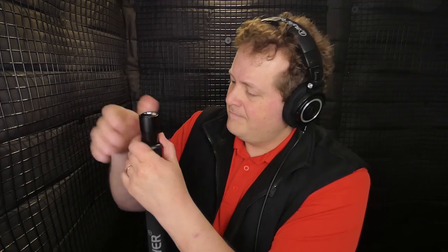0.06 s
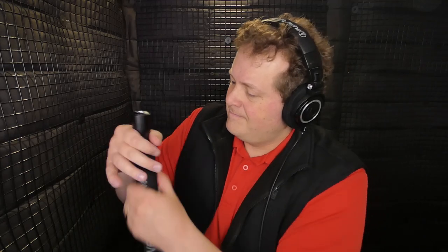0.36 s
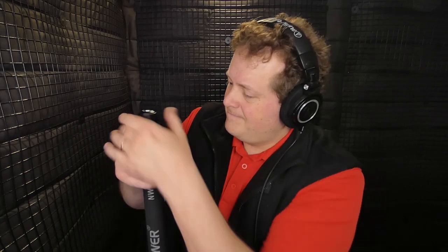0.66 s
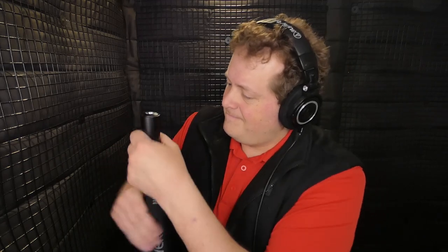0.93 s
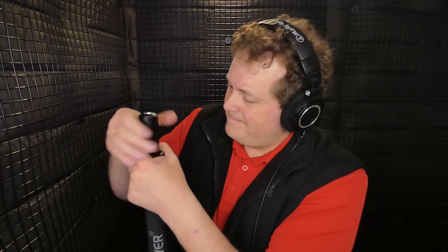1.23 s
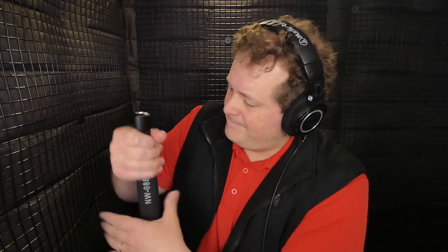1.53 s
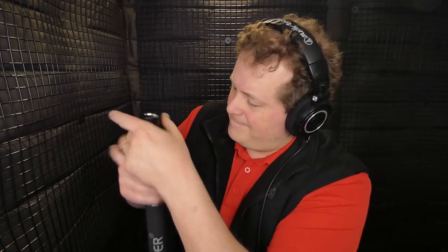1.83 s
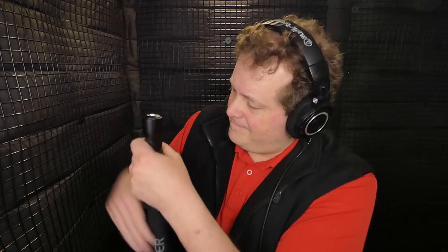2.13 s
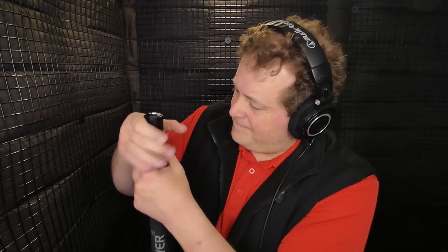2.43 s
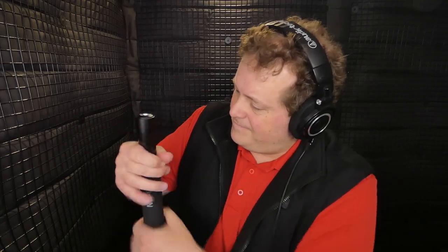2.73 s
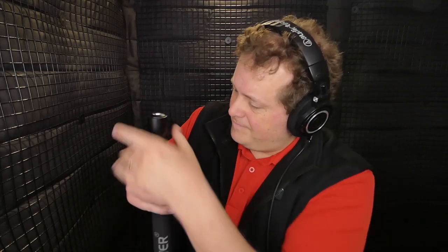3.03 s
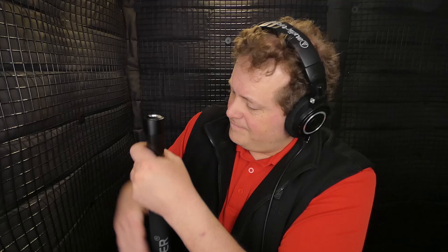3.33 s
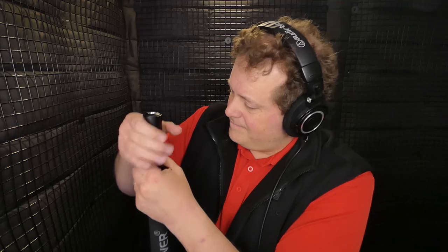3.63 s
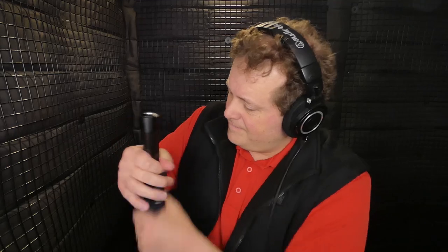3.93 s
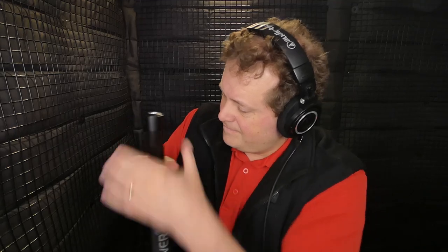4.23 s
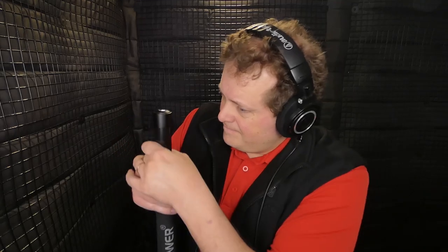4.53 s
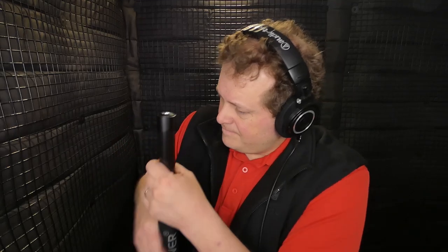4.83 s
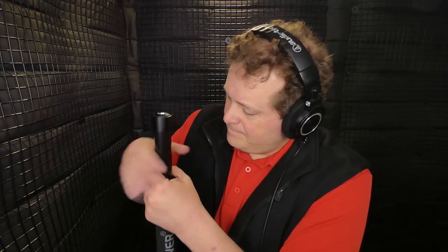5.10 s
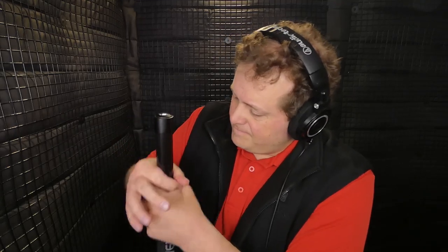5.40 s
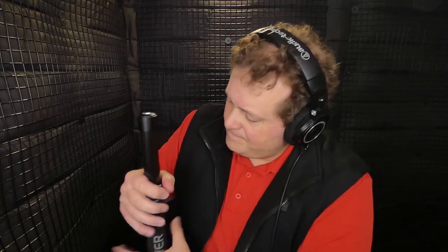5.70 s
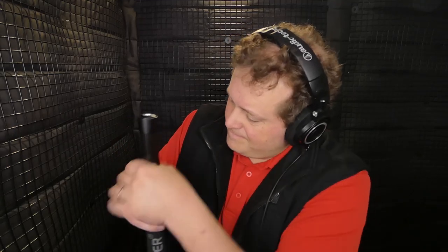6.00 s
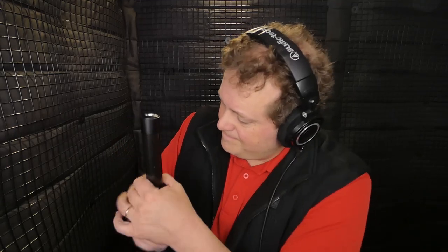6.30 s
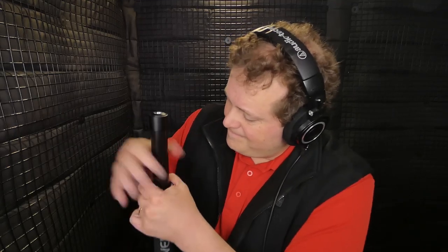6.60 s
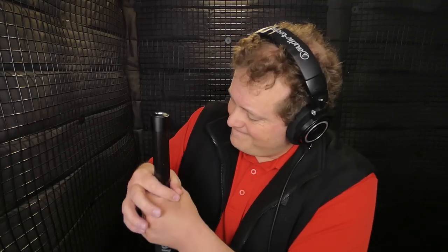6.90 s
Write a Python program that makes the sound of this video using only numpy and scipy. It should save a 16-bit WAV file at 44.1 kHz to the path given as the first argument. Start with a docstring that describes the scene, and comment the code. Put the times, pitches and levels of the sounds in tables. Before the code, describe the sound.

Two hands rub and grip an aluminum telescoping pole for about seven seconds, close to the microphone in a padded booth with almost no echo. Palms slide in short, uneven, hissing swishes, roughly two a second, with a slightly hollow rubbing tone. Small fingertip pops, ticks and dull knocks are scattered throughout. New grabs shake the pole with low thumps, notably at 0.8 and 2 seconds, and soft skin creaks come at the very start and around 1 second. A sharper tap lands at 2.5 seconds. The heaviest thump comes at 3.2 seconds with a firm swish, followed at 3.4 by a brief, bright, squeaky creak. More knocks and thumps fall between 3.6 and 4.7 seconds, with faint creaks near the end of that stretch. From 5 seconds the handling is lighter, with clear swishes at 5.4 and 7 seconds. A quiet, low room rumble continues underneath.

```python
"""Hands on an aluminium pole

Two hands work along a telescoping pole, close to one microphone in a padded booth. Sliding friction
makes the palms hiss and rings the air cavities under them; fingers tap and peel off the tube, and
tight skin creaks in stick-slip. Each new grab shakes the pole with a low thump, over a quiet room rumble."""
import sys
import numpy as np
from scipy import signal
from scipy.fft import rfft, irfft
from scipy.io import wavfile
from scipy.ndimage import uniform_filter1d

SR = 44100
rng = np.random.default_rng(int(sys.argv[2]) if len(sys.argv) > 2 else 0)


def dump_mix(stems):
    """Bounce the given channels to the path in sys.argv[1] as a 16-bit WAV at rate SR."""
    frames = np.atleast_2d(stems).T  # one column per channel
    limited = np.clip(frames, -1, 1)  # hard clip at full scale
    pcm = np.round(limited * 32767).astype(np.int16)
    wavfile.write(sys.argv[1], SR, pcm)


N = 315315
TIME = np.arange(N) / SR


def amp(db):
    """Amplitude ratio of a level in decibels."""
    return 10 ** (np.asarray(db) / 20)


def unit_rms(x):
    """Normalisation to an rms of 1."""
    return x / np.sqrt(np.mean(x ** 2) + 1e-20)


def add(mix, start_s, sound):
    """Superposition: a sound joins the mix at its start time."""
    part = mix[max(round(start_s * SR), 0):][:len(sound)]
    part += sound[:len(part)]


def colour(x, spectrum, size=8192):
    """Minimum-phase filtering by a spectrum of (frequency_hz, gain_db) points."""
    hz, db = np.transpose(spectrum)
    log_hz = np.log(abs(np.fft.fftfreq(size, 1 / SR)) + 1)
    log_gain = np.log(amp(np.interp(log_hz, np.log(hz), db)))
    response = np.fft.ifft(np.exp(np.conj(signal.hilbert(log_gain)))).real[:size // 2]
    return signal.fftconvolve(x, response)[:len(x)]


def wander(rate_hz):
    """Low-pass Gaussian noise: a smooth random fluctuation of rms 1."""
    hz = np.fft.rfftfreq(N, 1 / SR)
    return unit_rms(irfft(rfft(rng.standard_normal(N)) * np.exp(-(hz / rate_hz) ** 2), N))


def tube(x, reflection):
    """Reflection at the tube's end returns the wave twice, weaker each time."""
    lag = round(.00067 * SR)  # one round trip
    delayed = np.pad(x, (2 * lag, 0))
    return x + reflection * delayed[lag:lag + len(x)] + .17 * reflection ** 2 * delayed[:len(x)]


def friction(grains_per_s, spread_db, smooth):
    """Friction noise: sparse catches of the skin over a Gaussian bed of countless tiny slips."""
    size = amp(spread_db * np.minimum(rng.exponential(1, N), 3.5))
    catches = size * rng.choice([-1, 1], N) * (rng.random(N) < grains_per_s / SR)
    return unit_rms(unit_rms(catches) + smooth * rng.standard_normal(N))


def resonate(x, hz, width_hz):
    """A driven, damped resonator whose natural frequency follows the curve hz."""
    phasor = np.exp(2j * np.pi * np.cumsum(hz) / SR)
    pole = np.exp(-np.pi * width_hz / SR)
    return 2 * (phasor * signal.lfilter([1 - pole], [1, -pole], x / phasor)).real


def ringing(modes):
    """Forced vibration: random jostling drives each mode, shaped by two resonators in series."""
    out = np.zeros(N)
    for hz, nominal_width_hz, db in modes:
        pitch, width_hz = np.full(N, hz), 1.32 * nominal_width_hz
        once = resonate(rng.standard_normal(N), pitch, width_hz)
        out += amp(db) * unit_rms(resonate(once, pitch, width_hz))
    return unit_rms(out)


def stroking(layer, follow, lift_db_per_s, rest_db):
    """Friction grows with sliding speed: a layer's gain arches over each stroke and dies as skin lifts."""
    # strokes of a hand: fastest_s, rise_s, fall_s, sag_db (at both ends, for follow = 1),
    # then relative levels: hiss_db, swish_db, rub_db, body_db, rumble_db
    strokes = [(.005, 0.046, 0.08, 17, -60, -60, -59.5, -78, -82),
               (.16, 0.06, 0.027, 11, -60.5, -71, -66, -67, -69),
               (0.257, 0.085, 0.2, 28.5, -40.5, -43.5, -47.5, -55.5, -49),
               (.479, 0.012, 0.24, 19, -64.5, -60.5, -60, -59.5, -50.5),
               (.688, 0.029, 0.049, 10, -56, -52.5, -58.5, -72, -61),
               (0.794, .056, 0.15, 18.5, -38, -40.5, -46, -57.5, -53),
               (.956, .022, 0.06, 6.5, -58, -47, -48.5, -43.5, -46.5),
               (1.08, 0.037, 0.17, 34, -51, -49.5, -47.5, -52.5, -47.5),
               (1.316, 0.067, .13, 14.5, -38, -42, -43, -57, -49),
               (1.469, 0.003, 0.066, 14, -43, -45, -43, -49, -53),
               (1.594, .009, 0.04, 30, -67, -60, -46.5, -49, -50.5),
               (1.672, 0.074, 0.042, 27, -48, -52.5, -50.5, -53, -51.5),
               (1.815, .1, 0.036, 28, -43, -46, -45, -51, -45),
               (1.986, 0.1, 0.18, 22.5, -37.5, -46.5, -46, -46, -46.5),
               (2.012, 0.026, 0.018, 7, -34.5, -41, -56, -55, -52),
               (2.085, 0.034, 0.032, 6, -44.5, -58, -66, -54, -46),
               (2.22, 0.028, 0.15, 20, -61, -52, -53, -58, -49),
               (2.421, 0.09, 0.022, 12.5, -49, -45, -51.5, -70, -59),
               (2.632, 0.16, 0.12, 22, -39.5, -37.5, -47.5, -51.5, -44),
               (2.852, 0.09, 0.028, 11.5, -40, -45.5, -55, -61, -47.5),
               (3.003, 0.078, 0.014, 7.5, -54, -52, -53, -53.5, -59),
               (3.168, 0.12, 0.15, 27.5, -36, -40, -40, -41.5, -38),
               (3.477, 0.41, 0.062, 6.5, -57, -50, -53.5, -58.5, -49.5),
               (3.641, 0.078, 0.04, 19, -46, -45, -52, -53.5, -56),
               (3.708, .02, .07, 22, -50.5, -52, -54, -64, -72),
               (3.865, 0.13, 0.2, 22.5, -39.5, -40.5, -45.5, -52.5, -44),
               (3.973, 0.0046, 0.095, 17, -65, -45, -53, -52, -47),
               (4.161, 0.064, 0.073, 11, -63.5, -56.5, -52.5, -50.5, -52.5),
               (4.308, 0.046, .018, -1, -55.5, -50, -49.5, -51.5, -50),
               (4.421, 0.088, 0.13, 16, -61.5, -54.5, -52.5, -49, -50),
               (4.631, 0.11, 0.047, 20, -39, -39.5, -41, -44.5, -48),
               (4.811, .1, 0.03, 6.5, -50.5, -57, -53, -49.5, -54.5),
               (5.022, 0.018, 0.02, 9, -62, -55, -58.5, -62, -60),
               (5.13, 0.031, 0.034, 2, -62.5, -75, -85, -80, -73),
               (5.166, 0.022, 0.11, 24.5, -47.5, -49, -48.5, -50.5, -54.5),
               (5.41, 0.13, 0.034, 10, -57.5, -47.5, -51, -57.5, -67),
               (5.448, 0.041, 0.2, 12.5, -41, -39.5, -47.5, -55, -59),
               (5.719, 0.038, .034, 8, -45.5, -48.5, -53.5, -51.5, -56),
               (5.86, 0.067, 0.082, -9, -78.5, -80, -67.5, -65.5, -68),
               (6.029, 0.1, 0.051, 23, -54, -44, -49, -51.5, -54),
               (6.175, 0.16, 0.062, 22, -48, -42, -50.5, -55, -57),
               (6.347, 0.071, 0.065, 22, -51, -55, -48.5, -55.5, -53),
               (6.54, .01, 0.016, 19, -59, -55, -62, -78, -78),
               (6.633, 0.042, 0.034, 8, -55.5, -56, -66, -75, -83),
               (6.723, 0.069, .085, 15, -63, -54.5, -53.5, -54, -59.5),
               (6.95, 0.15, 0.019, 23, -70, -52.5, -57, -51, -51.5),
               (7.013, 0.065, 0.081, 18.5, -39.5, -38, -48, -53, -51.5),
               (7.143, .025, .03, 9, -66, -65, -58, -56, -60)]
    fastest_s, rise_s, fall_s, sag_db, *levels = np.transpose(strokes)
    layer_db = levels[["hiss", "swish", "rub", "body", "rumble"].index(layer)]
    land_db_per_s, flatness = 1100, 1.27
    t = TIME[::32]
    since = t[:, None] - fastest_s
    slowness = np.minimum(np.maximum(-since / rise_s, since / fall_s), 1) ** flatness
    landing_db = land_db_per_s * np.maximum(-since - rise_s, 0)
    lifting_db = lift_db_per_s * np.maximum(since - fall_s, 0)
    power = (amp(layer_db - follow * sag_db * slowness - landing_db - lifting_db) ** 2).sum(1)
    return np.interp(TIME, t, np.sqrt(power + amp(rest_db) ** 2))


def room_rumble():
    """Steady background noise, with most of its power at low frequencies."""
    # room spectrum: frequency_hz, gain_db
    spectrum = [(20, -9.5), (60, 6.5), (100, -9), (150, -20), (220, -27), (400, -37.5), (700, -29.5),
                (1200, -52), (4000, -71), (9000, -51), (16000, -56)]
    return amp(-50.5) * unit_rms(colour(rng.standard_normal(N), spectrum))


def sliding():
    """Sliding friction: slips merge into hiss in a fast stroke and part into crackle in a slow one."""
    # spectra of the fine hiss and the coarser swish: frequency_hz, gain_db
    hiss_spectrum = [(1500, -36), (3000, -9.5), (4600, -4), (7000, 1), (9500, -1.5), (11500, -6),
                     (14000, -7), (16000, -14.5)]
    swish_spectrum = [(700, -13), (1500, -11), (2400, -6), (3200, -6.5), (4400, -3), (6000, -5),
                      (10000, -24.5)]
    speed = stroking("hiss", follow=1, lift_db_per_s=900, rest_db=-84)
    grainy = 1 / (1 + speed / amp(-55))
    crackle = friction(grains_per_s=900, spread_db=4.5, smooth=1.2)
    drive = np.sqrt(1 - grainy) * rng.standard_normal(N) + np.sqrt(grainy) * crackle
    hiss = unit_rms(colour(drive * amp(1.6 * wander(rate_hz=78)), hiss_spectrum))
    rough = friction(grains_per_s=1100, spread_db=8.5, smooth=1.27)
    palm = resonate(rng.standard_normal(N), 3000 * np.exp(.14 * wander(rate_hz=12.3)), width_hz=270)
    swish = unit_rms(colour(rough, swish_spectrum)) + amp(-6) * unit_rms(colour(palm, swish_spectrum))
    swish_gain = stroking("swish", follow=1, lift_db_per_s=900, rest_db=-75.5)
    return hiss * speed + amp(-3.5) * unit_rms(swish) * swish_gain


def gripping():
    """Cavity resonance: coarse friction rings the hand's hollow, whose pitch shifts as fingers move."""
    # spectrum of the rubbing grip: frequency_hz, gain_db
    spectrum = [(300, -11), (650, 0), (950, 0.5), (1300, 5), (1750, 1.5), (2200, -4.5), (3000, -2),
                (6000, -39.5)]
    drive = friction(grains_per_s=450, spread_db=5, smooth=.82)
    hollow = resonate(drive, 1720 * np.exp(.11 * wander(rate_hz=18)), width_hz=190)
    rub = unit_rms(unit_rms(colour(drive, spectrum)) + amp(-.5) * unit_rms(hollow))
    return amp(-4.5) * rub * stroking("rub", follow=.55, lift_db_per_s=696, rest_db=-73)


def shaking():
    """Forced vibration of the handled pole: rumble, hollow body, a bending hum and a slow sway."""
    # the pole's low modes and body modes: pitch_hz, nominal_width_hz, relative_db
    low_modes = [(57.2, 17, 0), (129.5, 22.7, -4.5)]
    body_modes = [(193.5, 17, -4.5), (236.7, 27, 1.4), (330, 58, -1.7)]
    # spectra of the handling noise: frequency_hz, gain_db
    rumble_spectrum = [(20, -24), (45, -14), (62, -4), (105, 11), (150, 5), (220, -7.5), (400, -48.5)]
    scuff_spectrum = [(100, -28.5), (210, 4.5), (350, -3), (500, -8), (750, -9), (1500, -45.5)]
    # envelope of the lowest bending mode: time_s, level_db
    bend_envelope = [(0.0, -70), (0.26, -58.5), (1.77, -48), (2.37, -51.5), (3.3, -41), (3.4, -48),
                     (5.42, -44), (5.81, -54), (7.15, -41.5)]
    rumble = ringing(low_modes) + amp(-6) * unit_rms(colour(rng.standard_normal(N), rumble_spectrum))
    rumble = unit_rms(rumble) * stroking("rumble", follow=.43, lift_db_per_s=190, rest_db=-76)
    scuff = unit_rms(colour(friction(grains_per_s=200, spread_db=8.5, smooth=.9), scuff_spectrum))
    body = unit_rms(scuff + amp(1) * ringing(body_modes))
    body *= stroking("body", follow=.4, lift_db_per_s=400, rest_db=-68)
    bend_hz, bend_db = 82.6, np.interp(TIME, *np.transpose(bend_envelope))
    swing = amp(bend_db + 2.95 * wander(rate_hz=7.5))  # the grip damps it now more, now less
    bend = np.sqrt(2) * swing * np.sin(2 * np.pi * bend_hz * TIME + .88 * wander(rate_hz=7))
    sway = ringing([(18.15, 4.3, 0)])
    return amp(7.5) * rumble + amp(-3.5) * body + bend + amp(-46.5) * sway


def creaks():
    """Stick-slip: skin holds and lets go in a quick train of impulses, each echoing in the tube."""
    # one list per creak: time_s, slips_per_s, level_db, brightness (0 soft grip, 1 tight)
    gestures = [
        [(.005, 760, -49, 0), (.018, 890, -51.5, 0), (.034, 870, -59, 0), (.046, 1400, -68, 0)],
        [(.945, 266, -50, 0.29), (.968, 330, -44.5, 0.1), (.992, 304, -42, 0.01), (1.007, 360, -46, 0),
         (1.03, 550, -73, 0.04)],
        [(1.072, 270, -40.5, 0.27), (1.08, 310, -48, 0.12), (1.088, 360, -40, 0.18), (1.096, 210, -48, 0)],
        [(3.365, 1080, -66, 0.6), (3.388, 960, -41, 1), (3.402, 540, -34, 0.99), (3.416, 450, -35.5, 1),
         (3.432, 314, -36, 0.97), (3.448, 260, -36, 1), (3.462, 540, -37, 0.98), (3.486, 440, -36.5, 1),
         (3.5, 300, -45, 0.96), (3.53, 400, -63, .8)],
        [(4.52, 170, -49, .15), (4.535, 280, -51, 0.55), (4.552, 170, -50, 0.5), (4.575, 330, -68, 0.1)],
        [(4.71, 134, -50, 0.3), (4.728, 234, -50, 0.27), (4.75, 350, -53, 0.36), (4.77, 180, -57, .3)],
    ]
    # spectra of a slip under a soft and a tight grip: frequency_hz, gain_db
    soft_spectrum = [(200, -17), (650, -15), (920, 16), (1200, -25), (1800, 5.5), (2300, 2), (3200, -1.5),
                     (4500, -17), (8000, -11), (16000, -35)]
    tight_spectrum = [(300, -11), (1000, -17), (2100, -3.5), (2800, 8.5), (3800, 10), (4700, 8.5),
                      (6300, 1.5), (7500, -7.5), (10000, -35), (16000, -94)]
    out = np.zeros(N)
    for rows in gestures:
        time_s, *columns = np.transpose(rows)
        t = np.arange(time_s[0], time_s[-1], 1 / SR)
        rate, db, bright = (np.interp(t, time_s, column) for column in columns)
        jitter, force, grit = rng.standard_normal((3, len(t)))
        uneven = .03 + .12 * (1 - bright) * (rate < 600)  # slow, soft slipping is the least regular
        cycles = np.cumsum(rate * (1 + uneven * unit_rms(uniform_filter1d(jitter, 150)))) / SR
        releases = np.diff(np.floor(cycles), prepend=-1)
        slips = releases * np.exp(3 * uneven * force) * np.sqrt(SR / rate) + .09 * grit
        soft = unit_rms(tube(colour(slips, soft_spectrum), reflection=.22))
        tight = unit_rms(tube(colour(slips, tight_spectrum), reflection=.54))
        add(out, time_s[0], amp(db) * (np.sqrt(1 - bright) * soft + np.sqrt(bright) * tight))
    return out


def hollows():
    """Gliding cavity resonance: friction rings an air pocket that changes size under the moving palm."""
    # air pockets: start_s, length_s, relative_db, start_hz, end_hz
    pockets = [(0.14, 0.2, -51, 2750, 2500), (0.83, 0.091, -77, 1480, 1370), (1.356, 0.1, -51, 1690, 1340),
               (1.723, 0.053, -48, 1850, 2100), (1.91, 0.07, -45, 1610, 1440),
               (2.4, 0.041, -44.5, 4630, 4930), (2.535, 0.07, -42, 1510, 1220),
               (2.766, 0.13, -49, 3250, 3680), (3.193, 0.11, -57, 1730, 1240),
               (3.684, 0.054, -55, 3560, 3970), (3.785, 0.075, -44, 1310, 1390),
               (4.521, 0.06, -43, 1670, 1790), (5.391, 0.086, -41, 4500, 4500),
               (5.506, 0.11, -62, 2480, 2600), (6.116, 0.15, -50, 1500, 1800)]
    out = np.zeros(N)
    for start_s, length_s, db, start_hz, end_hz in pockets:
        n = round(length_s * SR)
        hz = np.geomspace(start_hz, end_hz, n)
        ring = resonate(rng.standard_normal(n), hz, width_hz=.25 * start_hz)
        ring = resonate(ring, hz, width_hz=.22 * start_hz)
        add(out, start_s, amp(db) * unit_rms(ring) * np.sin(np.pi * np.arange(n) / n))
    return amp(-2.5) * out


def light_contacts(count):
    """Random impacts: rows for taps(), as fingertips catch about as hard as the hand is rubbing."""
    rub_db = 20 * np.log10(stroking("rub", follow=.64, lift_db_per_s=501, rest_db=-69))
    at = rng.integers(0, N, count)
    force, pitch, nail = rng.uniform(-.96, 1, (3, count))
    pop_db = rub_db[at] - 4 + 6.5 * force
    tick_db = pop_db - 2 + 6.5 * nail
    pitch_hz, t60_s = 1850 * np.exp(.264 * pitch), np.full(count, .02)
    return list(zip(at / SR, pop_db, pitch_hz, t60_s, tick_db))


def taps():
    """Impulse excitation: each finger contact pops a pocket of air and sends a tick along the tube."""
    # fingers landing and lifting, at relative levels: start_s, pop_db, pitch_hz, t60_s, tick_db
    contacts = [(.2015, -40.5, 2280, .041, -63), (.2069, -43.5, 2030, 0.021, -57),
                (.221, -42, 2330, .021, -57), (.261, -63, 2350, .05, -35.5), (.391, -56, 900, .027, -46.5),
                (.466, -55, 2090, 0.014, -57), (.4817, -60, 1960, .023, -49),
                (.521, -53.5, 1910, 0.013, -56), (.6802, -54, 2190, .014, -33.5),
                (.941, -39, 2310, .01, -60), (1.015, -43, 1800, 0.055, -72), (1.054, -52, 910, 0.027, -55),
                (1.0677, -43, 2800, .011, -64), (1.0956, -37, 1610, 0.016, -46),
                (1.2916, -44, 1950, .018, -53), (1.3071, -39, 1610, 0.01, -40),
                (1.3291, -36, 2300, .026, -45), (1.4644, -39.5, 1340, 0.044, -41),
                (1.4887, -43.5, 1087, .046, -51), (1.6332, -55, 2390, .043, -49.5),
                (1.7683, -46.5, 2165, .01, -43), (1.8261, -37.5, 1700, 0.023, -62),
                (1.928, -35.5, 1595, 0.034, -53), (2.1168, -47.5, 2660, 0.013, -61),
                (2.2094, -55, 1670, 0.011, -48.5), (2.5196, -47, 1780, 0.021, -63),
                (2.5458, -29, 1590, 0.012, -32), (2.7558, -53, 865, 0.063, -44.5),
                (2.942, -49, 1990, 0.018, -61), (3.0831, -42.5, 1730, 0.015, -43),
                (3.1203, -39, 1450, .03, -52), (3.1508, -37, 1067, 0.077, -34),
                (3.1603, -38.5, 2290, .03, -37), (3.606, -47, 1680, 0.025, -45),
                (3.6191, -44.5, 1734, 0.031, -39), (3.6708, -46, 1720, 0.032, -53),
                (3.7808, -32.5, 1437, 0.026, -37.5), (3.7862, -39, 1380, .027, -40),
                (3.9276, -41, 1470, .021, -53), (3.9729, -36.5, 1910, 0.0073, -56),
                (4.0038, -46.5, 1690, .015, -40), (4.0602, -49, 1860, .016, -68),
                (4.116, -63, 2200, .012, -54), (4.2419, -46, 2176, 0.022, -49.5),
                (4.2674, -57, 1910, .028, -57), (4.3222, -41, 1245, 0.015, -60),
                (4.409, -46.5, 1250, 0.018, -58), (4.6206, -42.5, 1130, 0.062, -46),
                (4.639, -34, 1850, 0.02, -54), (4.7236, -39.5, 1700, 0.062, -49),
                (4.7441, -46.5, 970, 0.032, -43), (4.8481, -53.5, 1670, .017, -75),
                (4.8816, -55, 1930, 0.0054, -61), (5.0165, -50.5, 1840, 0.017, -44.5),
                (5.1687, -42, 1824, 0.034, -38), (5.1826, -40, 1750, 0.012, -40),
                (5.2052, -43, 1950, 0.021, -64), (5.2447, -44, 1780, 0.047, -72),
                (5.2866, -54, 1760, 0.019, -43), (5.302, -55, 1810, .033, -49),
                (5.4218, -56, 2390, .05, -41), (5.4591, -45, 1410, .041, -44),
                (5.6282, -54.5, 910, .031, -56.5), (5.9389, -46.5, 1530, 0.0071, -36),
                (5.967, -59, 1700, .012, -51), (5.995, -41.5, 1587, 0.055, -48),
                (6.0973, -42.5, 1970, 0.011, -51), (6.216, -52, 1900, .018, -68),
                (6.2794, -49.5, 1830, 0.067, -78), (6.3323, -47, 1650, 0.05, -43),
                (6.338, -35.5, 1760, 0.0093, -34), (6.463, -76, 2900, .01, -60.5),
                (6.484, -64.5, 3000, .01, -58), (6.6364, -51.5, 1940, 0.041, -44),
                (6.652, -50, 1890, 0.02, -66), (6.678, -45.5, 1980, 0.088, -50),
                (6.6913, -45, 1840, 0.016, -66), (6.7206, -44.5, 1950, 0.023, -55),
                (6.7355, -47.5, 1880, 0.015, -55), (6.7487, -55, 1940, .016, -62),
                (6.891, -55, 2370, 0.0089, -49), (7.074, -44, 1900, 0.02, -55)]
    # spectra of a fingertip's tick and a nail's: frequency_hz, gain_db
    tip_spectrum = [(500, -3), (1500, -2), (3000, 5), (5500, 12.5), (8000, 5), (11000, 1), (16000, -39)]
    nail_spectrum = [(500, -30), (1500, -2), (3000, -2), (5500, 3), (8000, -1.5), (11000, -4), (16000, -9)]
    pops, ticks, t = np.zeros(N), np.zeros(N), np.arange(2400) / SR
    burst_norm = np.sqrt(.005 * SR)  # gives the energy of 5 ms at rms 1
    rows = contacts + light_contacts(count=50)
    for start_s, pop_db, hz, t60_s, tick_db in rows:
        grit = rng.standard_normal(len(t))
        glide = 1 + .06 * grit[-1] * (np.exp(-t / .003) - .5)  # up or down as the skin settles
        phase = 2 * np.pi * np.cumsum(hz * glide) / SR
        decay = amp(-60 * t / t60_s)
        side_modes = .35 * np.sin(.72 * phase) + .32 * np.sin(2.05 * phase)
        pop = np.sin(phase) * decay + side_modes * decay ** 1.5
        pop *= 1 + .58 * unit_rms(uniform_filter1d(grit, 24))
        # little of the pop sounds below about half its pitch
        pop = signal.sosfilt(signal.butter(2, .44 * hz, "high", fs=SR, output="sos"), pop)
        add(pops, start_s, amp(pop_db) * burst_norm * pop / np.linalg.norm(pop))
        # a contact with little pop is a hard one, by nail or ring
        hard = 1 / (1 + amp(pop_db - tick_db + 1.5) ** 2)
        blow = (t == 0) + .07 * grit * np.exp(-t / .0015)
        tick = (1 - hard) * colour(blow, tip_spectrum) + hard * colour(blow, nail_spectrum)
        tick = tube(tick, reflection=.5 * (1 - hard))
        add(ticks, start_s, amp(tick_db) * burst_norm * tick / np.linalg.norm(tick))
    return amp(1.5) * pops + amp(-1.05) * ticks


def thumps():
    """Transient vibration: a grab sets the whole pole shuddering for a few cycles."""
    # grabs: start_s, level_db, pitch_hz, rise_s, overtone_db
    grabs = [(.252, -29, 56.1, 0.028, -5.5), (0.796, -24, 52.6, 0.027, -30), (1.303, -38, 57.2, 0.041, -7),
             (1.482, -35, 56.37, 0.031, -23), (1.982, -23.5, 51.3, 0.03, -30),
             (2.575, -31, 58.1, 0.027, -9), (3.163, -15, 54.1, 0.02, -7.5), (3.641, -32, 41.6, 0.022, -17),
             (3.834, -34.5, 79, 0.018, -11), (3.972, -27.5, 126.5, 0.019, -17),
             (4.308, -34.5, 76.7, 0.015, -11), (4.629, -26, 56.7, 0.029, -18),
             (6.018, -33.5, 61.4, 0.025, -18)]
    out, t = np.zeros(N), np.arange(SR // 3) / SR
    for start_s, db, hz, rise_s, overtone_db in grabs:
        swell = (t / rise_s * np.exp(1 - t / rise_s)) ** 1.26
        phase = 2 * np.pi * hz * t
        add(out, start_s, -amp(db) * swell * (np.sin(phase) + amp(overtone_db) * np.sin(2.4 * phase)))
    return out


def knocks():
    """Damped oscillation: soft flesh strikes the tube, exciting a low mode and a woody upper one."""
    # dull blows of the hand: time_s, relative_db, nominal_pitch_hz
    blows = [(.775, -42, 387), (.932, -32, 330), (.937, -31.5, 320), (1.098, -35.5, 250), (1.307, -29, 497),
             (1.513, -36.5, 355), (1.59, -37, 257), (1.602, -38, 269), (1.612, -32.5, 230),
             (1.752, -38, 222), (1.958, -41, 334), (1.972, -34.5, 347), (2.058, -40.5, 290),
             (2.544, -40, 328), (2.754, -47, 288), (3.146, -32.5, 460), (3.157, -32, 415),
             (3.235, -40, 314), (3.78, -35.5, 335), (3.972, -37, 314), (4.003, -36.5, 285),
             (4.409, -34, 343), (4.414, -29.5, 326), (4.616, -35.5, 324), (5.016, -45.5, 260),
             (5.611, -39, 258), (5.938, -46, 400), (6.337, -36, 260), (6.89, -40, 290)]
    out, t = np.zeros(N), np.arange(3000) / SR
    attack = 1 - np.exp(-t / .00048)
    for time_s, db, hz in blows:
        low = np.sin(2 * np.pi * hz * .895 * t) * amp(-60 * t / .025)
        high = np.sin(2 * np.pi * hz * 2.55 * t) * amp(-16 - 60 * t / .023)
        add(out, time_s - .001, amp(db) * (low + high) * attack)
    return amp(4.5) * out


def booth(x, wet_db, t60_s):
    """Absorption: padded walls return only a faint, very short scatter of reflections."""
    t = np.arange(SR // 5) / SR
    scatter = rng.standard_normal(len(t)) * (rng.random(len(t)) < .1)
    scatter *= (t > .003) * amp(-60 * t / t60_s)
    return x + amp(wet_db) * signal.fftconvolve(x, scatter / np.linalg.norm(scatter))[:N]


def scene():
    """All sources superpose at one microphone, the same in both channels."""
    hands = sliding() + gripping() + hollows() + taps() + knocks() + creaks()
    mix = booth(hands, wet_db=-11.5, t60_s=.023) + thumps() + shaking() + room_rumble()
    return np.tile(mix, (2, 1))


def record(dry):
    """Band limiting: a steep low-pass filter removes the highest treble."""
    cutoff_hz = 16050
    lowpass = signal.firwin(511, cutoff_hz, window=("kaiser", 9), fs=SR)
    return signal.oaconvolve(dry, lowpass[None], "same")


dry = scene()
out = record(dry)
dump_mix(out)
```